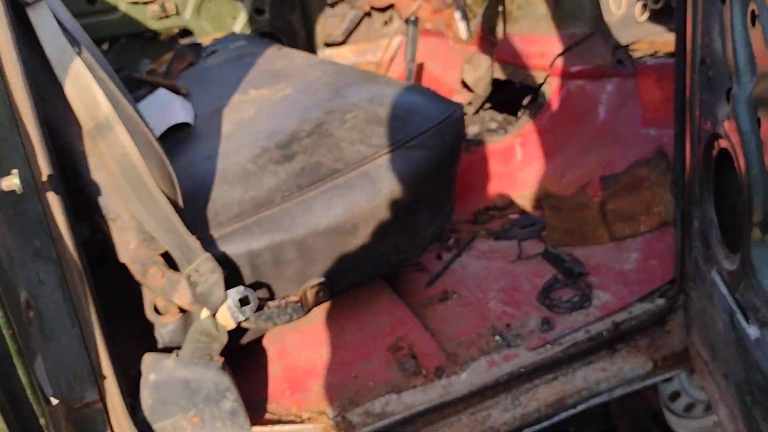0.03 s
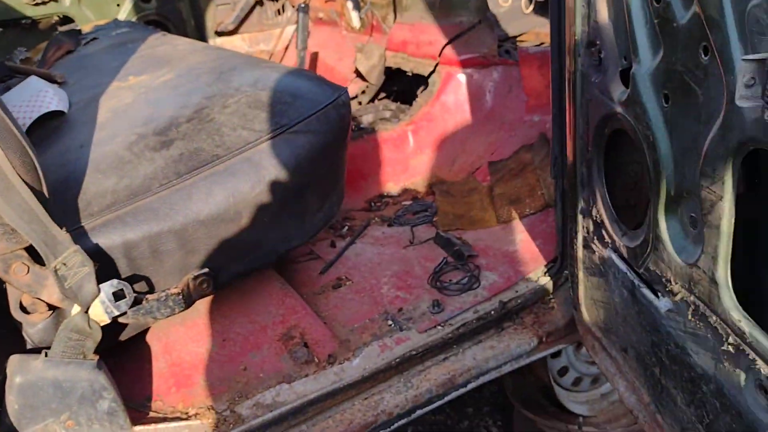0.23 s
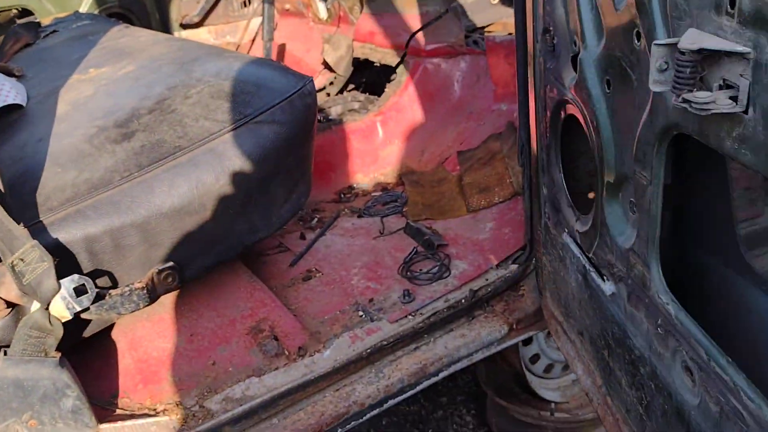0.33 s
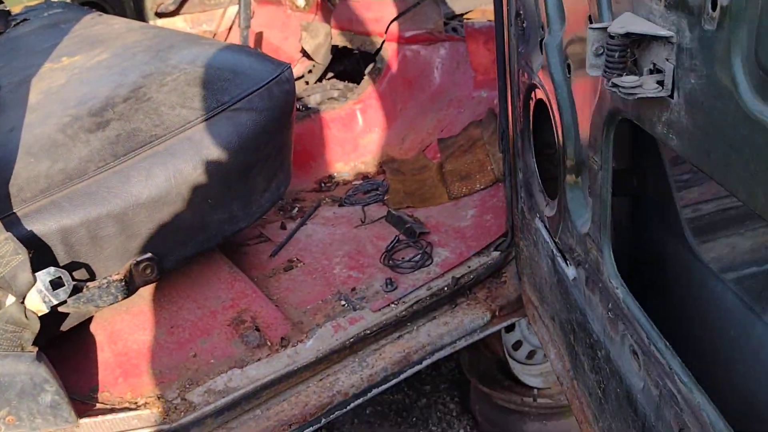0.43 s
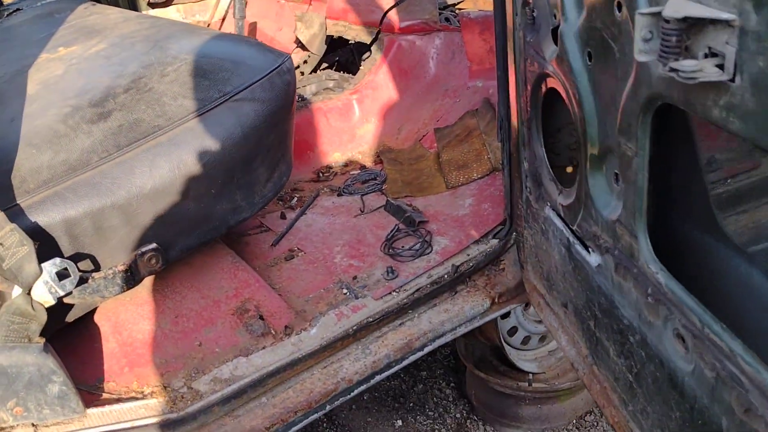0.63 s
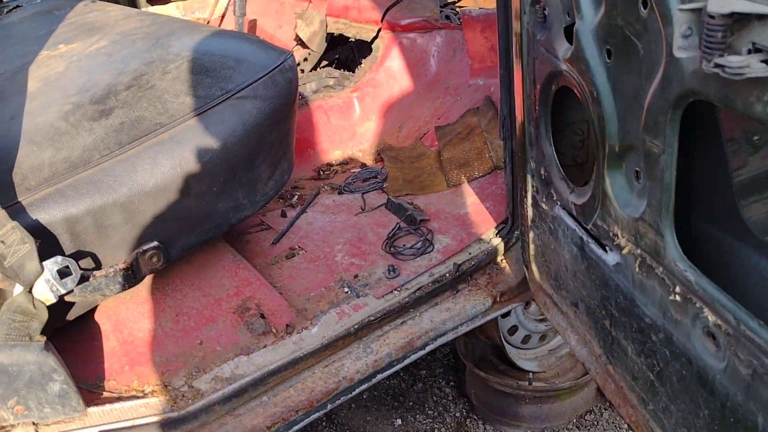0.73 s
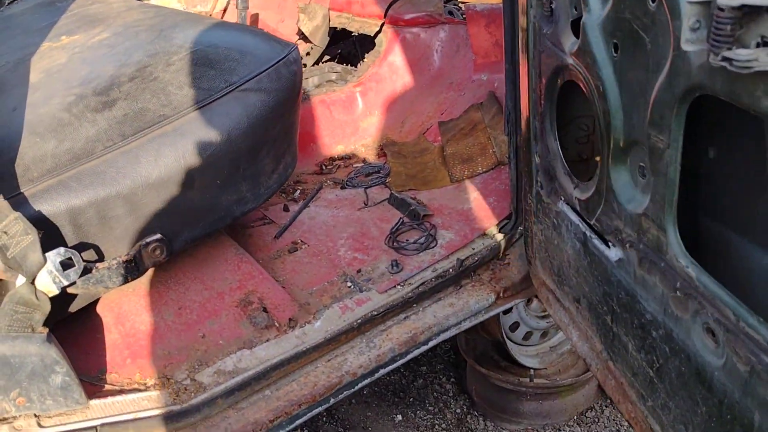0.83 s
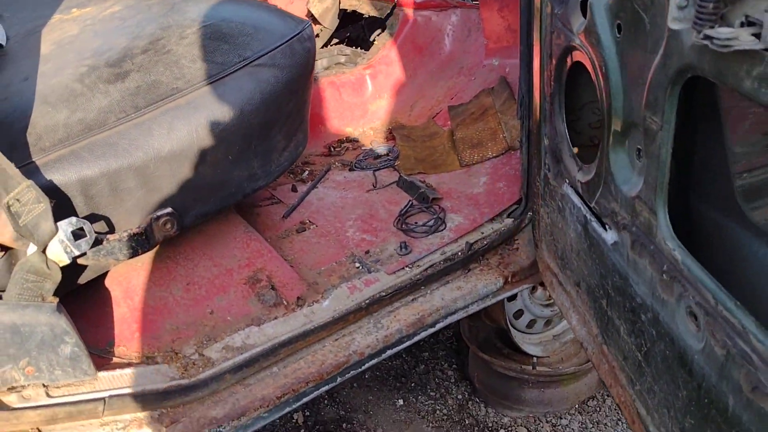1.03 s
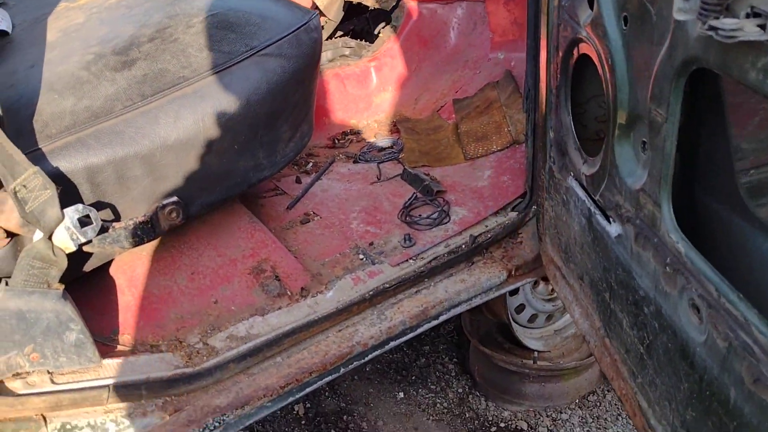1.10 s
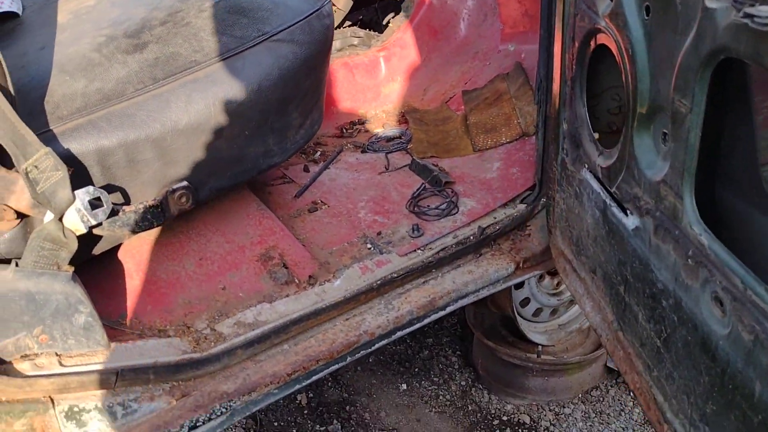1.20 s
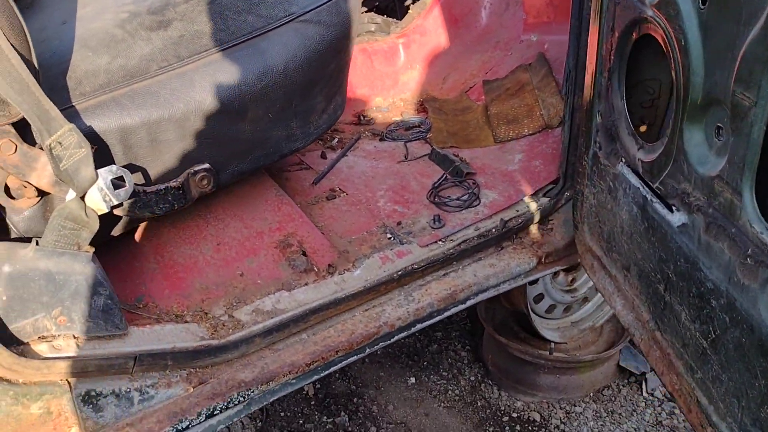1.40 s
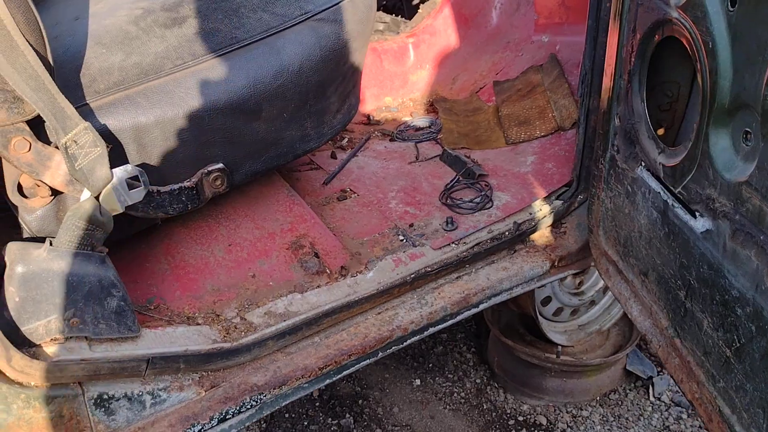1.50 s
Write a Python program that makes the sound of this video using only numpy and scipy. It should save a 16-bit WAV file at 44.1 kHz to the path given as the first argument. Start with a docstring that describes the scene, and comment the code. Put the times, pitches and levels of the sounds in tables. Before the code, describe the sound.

A metal vehicle door swings open with a rusty scrape, rattling and a small knock.

```python
"""A rusty truck door is pulled open close by, outdoors, over low wind and a faint hiss.
The dry hinge starts to scrape softly, then the latch ticks and lets go. As the door swings, rust sticks
and slips, and jolts make the hollow steel skin boom and wobble, the frame clank and the stay (the arm
that holds the door) clink. From 0.8 s the stay's loose catch jingles, then snaps home. At about 1.1 s
the door meets its stop with a short groan and a knock, and the shudder dies away."""
import sys
import numpy as np
from scipy import signal
from scipy.fft import irfft, next_fast_len
from scipy.io import wavfile
from scipy.ndimage import uniform_filter1d

SR = 44100
rng = np.random.default_rng(int(sys.argv[2]) if len(sys.argv) > 2 else 0)


def to_wav(s):
    """Save 16-bit WAV."""
    ch = np.atleast_2d(s).T  # columns
    pcm = np.round(np.clip(ch, -1, 1) * 32767)  # PCM
    wavfile.write(sys.argv[1], SR, pcm.astype(np.int16))


N = 68355
SKIN_PAN_DB, FRAME_PAN_DB, METAL_PAN_DB = 0.25, 1, -6.5


def amp(db):
    """Turn decibels into a gain."""
    return 10 ** (np.asarray(db) / 20)


def pan(db):
    """Left and right gains; the left is louder by db."""
    return amp(np.array([[db], [-db]]) / 2)


def unit(x):
    """Scale a sound to an average energy of 1 per channel."""
    return x / np.sqrt(np.mean(np.sum(x ** 2, axis=-1)))


def dull(x, top_hz):
    """Soften the treble above top_hz."""
    return signal.sosfilt(signal.butter(3, top_hz, fs=SR, output="sos"), x)


def curve(table, column=1):
    """Join the points of a time table with straight lines."""
    rows = np.array(table)
    return np.interp(np.arange(N) / SR, rows[:, 0], rows[:, column])


def arch(start_s, length_s):
    """A smooth swell from silence to 1 and back."""
    return np.sin(np.pi * np.clip((np.arange(N) / SR - start_s) / length_s, 0, 1))


def decay(t, ring_s):
    """A fade that drops 60 dB in the ring time, ring_s."""
    return np.exp(-np.log(1000) * t / ring_s)


def add(out, x, start_s):
    """Mix a stereo sound in at its time."""
    start = int(start_s * SR)
    part = x[:, :N - start]
    out[:, start:start + part.shape[1]] += part


def noise(colour, width, size=N):
    """Stereo noise whose colour says how strong each pitch is."""
    hz, db = np.array(colour).T
    length = next_fast_len(size)
    f = np.maximum(np.fft.rfftfreq(length, 1 / SR), 1)
    gain = amp(np.interp(np.log(f), np.log(hz), db, left=-70, right=-90))
    side_gain = gain * f / np.hypot(f, 410)  # left and right grow alike below 410 Hz
    phases = np.exp(2j * np.pi * rng.random((2, len(f))))
    mid, side = irfft(np.array([gain, side_gain]) * phases, length)[:, :size]
    x = np.array([mid + width * side, mid - width * side])
    return x / x.std()


def dense_ring(colour, ring_s, width=1, size=16384):
    """Steel rings with countless tones, differently at each spot that is touched."""
    t = np.arange(size) / SR
    tail = amp(-38.5) * decay(t, ring_s=0.15)  # the cab and nearby wrecks answer
    return unit(noise(colour, width, size) * (decay(t, ring_s) + tail))


def tone_ring(tones, spread, size=16384):
    """A part rings with a few clear tones; spread puts left and right out of step."""
    t = np.arange(size) / SR
    shift = spread * rng.uniform(-np.pi, np.pi, (len(tones), 2, 1))
    return unit(sum((-1) ** k * amp(db) * decay(t, ring_s) * np.sin(2 * np.pi * hz * t + shift[k])
                    for k, (hz, db, ring_s) in enumerate(tones)))


def sound(force, ring):
    """Every push in the force sets the part ringing."""
    return signal.fftconvolve(force[None], ring, axes=1)[:, :N]


def grains(per_s, size=N):
    """Tiny pushes of uneven strength at random times."""
    pushes = (rng.random(size) < per_s / SR) * rng.choice([-1, 1], size)
    x = pushes * amp(3.5 * np.clip(rng.standard_normal(size), -2, 2))
    return x / x.std()


def blow(db, chatter, contact_s=0.012, chatter_s=0.014, size=4096):
    """The force of one knock: a hit, then loose parts bounce briefly."""
    fade = np.exp(-np.arange(size) / SR / chatter_s)
    hit = chatter * unit(grains(per_s=760, size=size) * fade)
    hit[0] += 1
    return amp(db) * np.sqrt(contact_s * SR) * unit(hit)


def rubbing(level_db, make_ring, spots=4, slips_per_s=1100):
    """Rust sticks and slips at several spots on one part."""
    rubs = (sound(grains(slips_per_s / spots) * amp(level_db), make_ring()) for _ in range(spots))
    return sum(rubs) / np.sqrt(spots)


# Colours of the wind and the hiss: (pitch [Hz], relative level [dB])
WIND_COLOUR = [(20, -22), (45, -18.5), (80, 1.5), (150, -10.5), (290, -9.5), (500, -14), (1000, -48)]
HISS_COLOUR = [(200, -2), (550, 4), (1100, 3), (1900, -10), (2500, -5.5), (2850, 0), (3500, -28),
               (5500, -19.5), (7000, -28), (15000, -39.5)]
def wind_and_hiss():
    """Low wind blows, with a distant hiss to the right."""
    wind = amp(-42) * noise(WIND_COLOUR, width=0.9)
    hiss = amp(-51.5) * noise(HISS_COLOUR, width=0.93)
    return wind + pan(db=-11.5) * hiss


# Colour of the door's steel skin: (pitch [Hz], relative level [dB])
SKIN_COLOUR = [(30, -35), (55, -29.5), (85, -14.5), (115, -6.5), (150, -10), (200, -6), (280, 3), (350, -5),
               (430, -4), (540, -23.5), (900, -51)]
def skin_ring():
    """The hollow skin answers a push with a low boom."""
    return dense_ring(SKIN_COLOUR, ring_s=0.19, width=0.37)


# Colour of the door's frame: (pitch [Hz], relative level [dB])
FRAME_COLOUR = [(250, -30), (440, 0), (620, -3.5), (900, 0), (1300, -6), (1700, -13), (2300, -11.5),
                (3500, -20), (7000, -59)]
def frame_ring():
    """The frame answers a push with a clank."""
    return dense_ring(FRAME_COLOUR, ring_s=0.15, width=0.98)


# How hard the hinge rubs: (time [s], skin shudder [dB], frame grind [dB], rust rasp [dB])
HINGE_RUB = [(0.0, -56, -50.5, -67), (0.17, -38.5, -53, -59), (0.235, -34.5, -41.5, -46),
             (0.25, -25, -35, -43.5), (0.33, -23.5, -26, -29.5), (0.385, -16, -24.5, -25),
             (0.43, -15.5, -15, -20), (0.485, -17.5, -24, -15.5), (0.52, -19.5, -23, -24.5),
             (0.559, -28.5, -23.5, -19.5), (0.65, -21, -30.5, -40.5), (0.72, -26, -33, -37),
             (0.8, -26, -34, -51), (0.9, -29.5, -34.5, -42), (1.029, -27, -40.5, -51.5),
             (1.09, -27.5, -34, -42.5), (1.15, -21.5, -36.5, -58), (1.27, -30.5, -45, -56.5),
             (1.4, -41.5, -49, -59.5), (1.55, -52, -55, -71)]
# Colour of the rasping rust: (pitch [Hz], relative level [dB])
RASP_COLOUR = [(900, -23), (2100, -19.5), (2900, 6), (4000, 1), (5500, -5), (8000, -11), (10500, -16.5),
               (15500, -31)]
# The rasp is bright while the door moves fast: (time [s], treble limit [Hz])
RASP_BRIGHTNESS = [(0.26, 4000), (0.34, 10200), (0.5, 13000), (0.7, 13000), (0.9, 8800), (1.0, 6000),
                   (1.07, 9800), (1.2, 4500)]
def hinge_scrape():
    """The dry hinge shakes the skin, grinds in the frame and rasps."""
    shudder = dull(rubbing(curve(HINGE_RUB, column=1), skin_ring), top_hz=897)
    grind = dull(rubbing(curve(HINGE_RUB, column=2), frame_ring), top_hz=4880)
    rasp = rubbing(curve(HINGE_RUB, column=3), lambda: dense_ring(RASP_COLOUR, ring_s=0.059))
    hz, times, slices = signal.stft(rasp, SR)  # each short slice gets its own treble limit
    top_hz = np.interp(times, *np.array(RASP_BRIGHTNESS).T)
    treble_cut = np.hypot(1, (hz[:, None] / top_hz) ** 3)
    rasp = signal.istft(slices / treble_cut, SR)[1][:, :N]
    return pan(SKIN_PAN_DB) * shudder + pan(FRAME_PAN_DB) * grind + pan(METAL_PAN_DB) * rasp


# The skin's own tones:
# (pitch [Hz], relative level when struck [dB], relative level when wobbling [dB], ring time [s])
SKIN_TONES = [(109.45, -4, -4, 0.5), (150.6, -7.5, -8.5, 0.64), (192.1, -4.5, 2.5, 0.49),
              (239.3, 1, -1, 0.62), (265, 2.5, -8.5, .3), (281.7, -14.5, -18, 0.3), (391, 2, -16, 0.17)]
def skin_tones(struck):
    """The skin hums with a different mix of low tones when struck than when wobbling."""
    tones = [(hz, struck_db if struck else wobble_db, ring_s)
             for hz, struck_db, wobble_db, ring_s in SKIN_TONES]
    return tone_ring(tones, spread=0.11)


# How strongly the swinging door wobbles: (time [s], level [dB])
WOBBLE_LEVELS = [(0.2, -44), (0.25, -28.5), (0.37, -39), (0.42, -15), (0.55, -19), (0.66, -17), (0.71, -18),
                 (0.8, -20), (0.92, -27.5), (1.12, -31), (1.55, -45)]
def skin_wobble():
    """Rubbing keeps the skin's low tones sounding, with uneven strength."""
    hum = sound(grains(per_s=1100), skin_tones(struck=False))
    swell = np.sqrt(uniform_filter1d(np.mean(hum ** 2, axis=0), size=2048) + 1e-6)
    steadier_hum = hum / swell ** 0.45  # partly evens out the random swells
    return pan(SKIN_PAN_DB) * amp(curve(WOBBLE_LEVELS)) * steadier_hum


# Knocks of the latch, stay and stop:
# (time [s], skin boom [dB], frame clank [dB], clink [dB], clink's treble limit [Hz], crack [dB])
KNOCK_HITS = [(0.179, -28.5, -44, -36.5, 11000, -34), (0.242, -21, -24.5, -29.5, 3300, -63),
              (0.257, -30.5, -29.5, -34.5, 6520, -40), (0.296, -26.5, -35, -24.5, 3430, -68),
              (0.3404, -14.5, -12.5, -16, 6950, -20), (0.413, -23, -15, -23, 6000, -21.5),
              (0.45, -18.5, -42, -16, 10300, -12.5), (0.480, -36, -19.5, -15, 7200, -36),
              (0.497, -18, -22, -32, 12000, -17.5), (0.529, -18.5, -27, -29, 7840, -33),
              (0.5529, -17, -25, -14, 13000, -10), (0.569, -22.5, -21, -22, 13000, -37.5),
              (0.608, -18.5, -37, -20.5, 9850, -22.5), (0.662, -29.5, -27, -32, 13700, -29),
              (0.68, -17, -27.5, -35.5, 11700, -54), (0.739, -22.5, -43, -36, 12100, -38),
              (0.815, -22.5, -27.5, -38.5, 12400, -38.5), (0.979, -25.5, -35.5, -42, 4800, -78.5),
              (1.101, -30.5, -30.5, -32, 5500, -64.5), (1.121, -20, -36.5, -35, 4500, -73.5),
              (1.143, -31, -31, -43, 9060, -59.5), (1.189, -26.5, -30, -42, 3830, -74)]
# The stay's own tones: (pitch [Hz], relative level [dB], ring time [s])
STAY_TONES = [(2525, -1, 0.14), (3020, 4.5, 0.25), (3150, -0.5, 0.18), (3340, 0.5, .17), (4000, -3, 0.19),
              (5000, -4, 0.148), (6000, -3, 0.1)]
# Colours of loose metal clinking and bare steel cracking together: (pitch [Hz], relative level [dB])
CLINK_COLOUR = [(900, -27.5), (2100, -6), (2800, 8), (4000, 6), (5500, 5), (8000, -6), (10500, -7.5),
                (15500, -23)]
CRACK_COLOUR = [(2500, -10.5), (5000, -2.5), (8000, 4.5), (11000, -8.5), (15500, -8)]
def knocks():
    """Steel meets steel with a crack: the skin booms, the frame clanks and the stay clinks."""
    out = np.zeros((2, N))
    stay = amp(-20) * tone_ring(STAY_TONES, spread=0.62)
    skin = amp(-1.5) * skin_tones(struck=True)
    for start_s, boom_db, clank_db, clink_db, top_hz, crack_db in KNOCK_HITS:
        boom = sound(blow(boom_db, chatter=0.32), skin + amp(0.5) * skin_ring())
        clank = sound(blow(clank_db, chatter=amp(-1)), frame_ring())
        clink = sound(blow(clink_db, chatter=amp(-1)), stay + dense_ring(CLINK_COLOUR, ring_s=0.1))
        first_touch = blow(crack_db, chatter=0.3, contact_s=0.0017)
        crack = sound(first_touch, dense_ring(CRACK_COLOUR, ring_s=0.086))
        add(out, pan(SKIN_PAN_DB) * dull(boom, top_hz=910), start_s)
        add(out, pan(FRAME_PAN_DB) * dull(clank, top_hz=4410), start_s)
        add(out, pan(METAL_PAN_DB) * dull(clink, top_hz), start_s)
        add(out, pan(db=1) * crack, start_s)
    return out


# The latch's two ticks: (time [s], level [dB])
TICKS = [(0.1807, -33), (0.1913, -36.5)]
# Colour of the latch: (pitch [Hz], relative level [dB])
LATCH_COLOUR = [(2000, -34), (2500, 7), (3200, -1), (4200, -17)]
def latch():
    """The rusty latch lets go with a dry double tick."""
    out = np.zeros((2, N))
    for start_s, db in TICKS:
        tick = sound(blow(db, chatter=0.36), dense_ring(LATCH_COLOUR, ring_s=0.097))
        add(out, tick, start_s)
    return pan(METAL_PAN_DB) * out


# The skin's note depends on where it bends: (time [s], pitch [Hz], peak level [dB])
FLEX_NOTES = [(0.239, 252.3, -15), (0.246, 83.5, -22), (0.341, 284, -10), (0.37, 303, -17),
              (0.392, 105.5, -15.5), (0.692, 194, -15), (0.975, 286.7, -19.5), (1.116, 266.3, -16),
              (1.134, 200.3, -16)]
def skin_flexes(rise_s=0.012, bend=0.04, size=8192):
    """Jolts bend the skin: a hollow note swells, sags in pitch and dies."""
    out = np.zeros((2, N))
    age = np.arange(size) / SR / rise_s
    swell = age * np.exp(1 - age)
    for start_s, hz, db in FLEX_NOTES:
        sagging_hz = hz * (1 + bend * np.exp(-age))
        phase = 2 * np.pi * np.cumsum(sagging_hz) / SR
        add(out, pan(SKIN_PAN_DB) * amp(db) * swell * np.sin(phase), start_s)
    return out


# The catch's own tones: (pitch [Hz], relative level [dB], ring time [s])
CATCH_TONES = [(1940, 1, 0.043), (2486, -2.5, 0.086), (2756, -1, .07), (3110, -1, .05), (3590, -1, 0.059),
               (5160, -3.5, 0.079), (6480, -3.5, 0.052), (8280, -0.5, .015)]
def catch_ring(favoured_hz, drop_db_per_octave=25):
    """The spot where the catch is hit favours the tones near one pitch."""
    tones = [(hz, db - drop_db_per_octave * abs(np.log2(hz / favoured_hz)), ring_s)
             for hz, db, ring_s in CATCH_TONES]
    return tone_ring(tones, spread=0.74)


# Snaps of the catch: (time [s], level [dB], favoured pitch [Hz])
CATCH_SNAPS = [(0.981, -44.5, 3580), (1.0995, -36, 7430), (1.102, -32, 3070), (1.108, -33, 2160)]
def catch():
    """The loose catch jingles along the stay, then snaps home."""
    jingle = amp(-48) * arch(start_s=0.79, length_s=0.45) * grains(per_s=120)
    out = sound(jingle, catch_ring(favoured_hz=2780))
    for start_s, db, hz in CATCH_SNAPS:
        add(out, sound(blow(db, chatter=0.81), catch_ring(hz)), start_s)
    return pan(db=-8) * dull(out, top_hz=9000)


# The groan's main note, then its octave: (relative level [dB])
GROAN_TONES = [5.5, -5]
def hinge_groan(start_s=1.068, start_hz=445, rise_hz_per_s=220):
    """The hinge slips almost regularly for a moment, rising in pitch as the door reaches its stop."""
    hz = start_hz + rise_hz_per_s * (np.arange(N) / SR - start_s)
    waver = 0.42 * uniform_filter1d(rng.standard_normal(N), size=64)
    phase = 2 * np.pi * np.cumsum(hz * (1 + waver)) / SR
    note = sum(amp(db) * np.sin((k + 1) * phase) for k, db in enumerate(GROAN_TONES))
    return amp(-26) * arch(start_s, length_s=0.12) * note


def scene():
    """The door opens in the wind, its deepest rumble trimmed away."""
    door = knocks() + skin_flexes() + latch() + catch() + hinge_scrape() + skin_wobble() + hinge_groan()
    bass_cut = signal.butter(2, 59, "high", fs=SR, output="sos")
    return signal.sosfilt(bass_cut, door) + wind_and_hiss()


def record(dry):
    """Clip the sound at full scale and cut the highest treble."""
    treble_cut = signal.ellip(10, 0.2, 70, 15700, fs=SR, output="sos")
    return signal.sosfilt(treble_cut, np.clip(dry, -1, 1))


dry = scene()
out = record(dry)
to_wav(out)
```